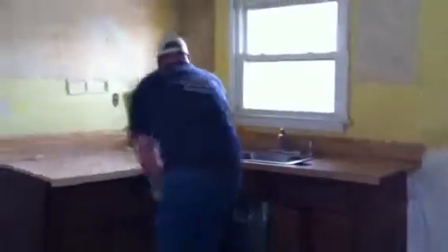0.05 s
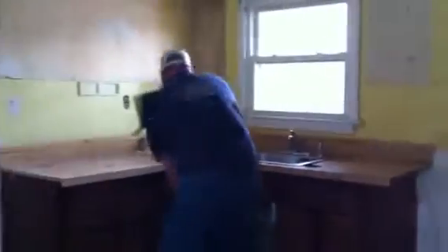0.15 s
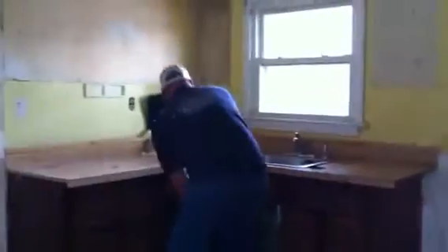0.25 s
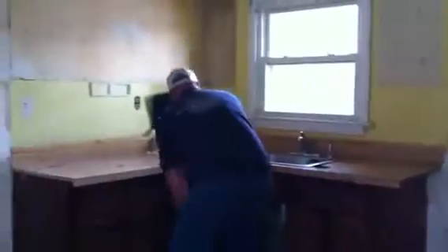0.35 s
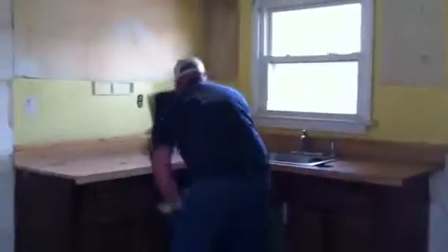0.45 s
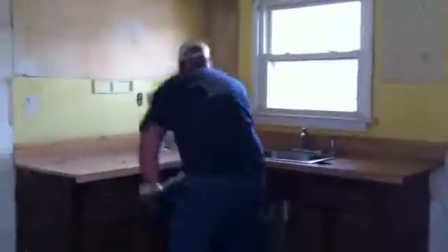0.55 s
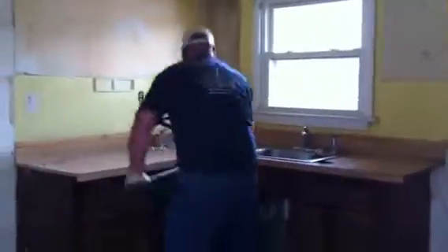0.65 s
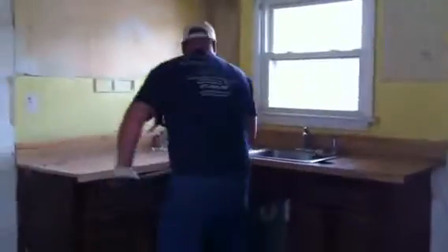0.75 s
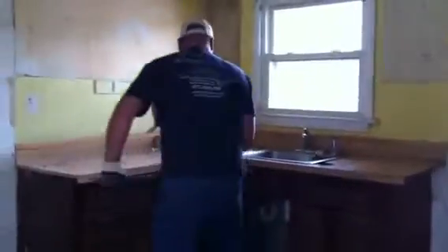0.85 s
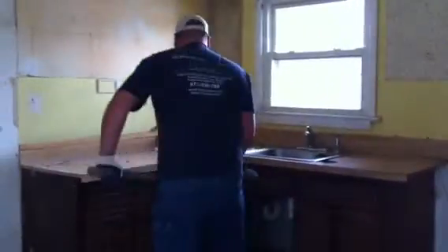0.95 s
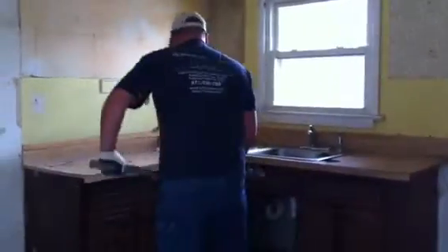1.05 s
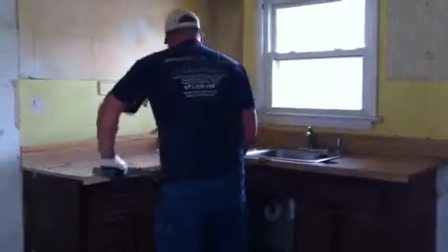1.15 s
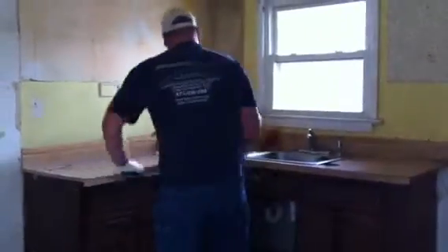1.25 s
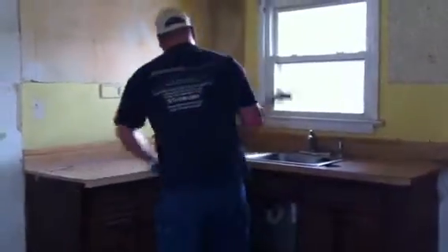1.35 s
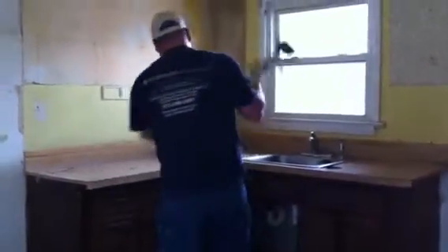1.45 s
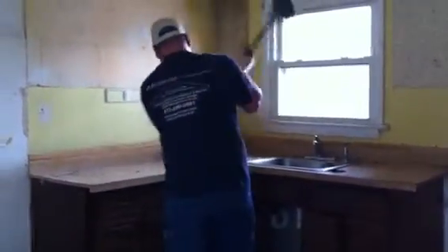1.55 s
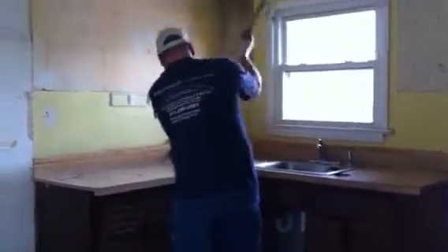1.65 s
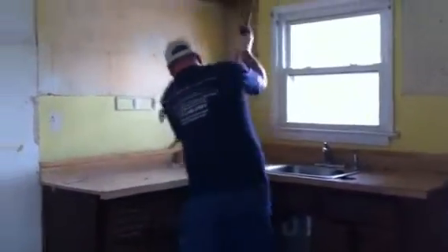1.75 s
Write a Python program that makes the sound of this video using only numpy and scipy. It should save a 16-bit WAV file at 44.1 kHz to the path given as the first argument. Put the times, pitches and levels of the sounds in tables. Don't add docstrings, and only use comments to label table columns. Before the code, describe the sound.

Heavy countertop being torn loose: low rumbling thumps and creaky cracks build to a loud slab crash, shards clatter, then one sharp clack and near quiet. Reverberant empty kitchen, small camera microphone with little bass.

```python
import sys
import numpy as np
from scipy import signal
from scipy.fft import rfft, irfft, next_fast_len
from scipy.io import wavfile
from scipy.ndimage import uniform_filter1d

SR = 44100
rng = np.random.default_rng(int(sys.argv[2]) if len(sys.argv) > 2 else 0)


def bounce(signal):
    frames = np.transpose(np.atleast_2d(signal))
    limited = np.clip(frames, -1, 1)
    pcm = np.round(limited * 32767).astype(np.int16)
    wavfile.write(sys.argv[1], SR, pcm)


def gain_from_db(level_db):
    decades = np.asarray(level_db, float) / 20
    return 10 ** decades


N = 79380
T_S = np.arange(N) / SR

# (time [s], level [dB], hold [s], centre of modes stirred [Hz])
THUD_EVENTS = [(.0, -33.5, 0.12, 297), (.001, -32, 0.15, 174), (0.031, -30.5, 0.028, 303),
               (.12, -35, 0.083, 193), (0.146, -26, 0.018, 250), (0.181, -31.5, 0.051, 236),
               (0.24, -28, 0.048, 277), (0.248, -29, 0.035, 149), (.314, -30, 0.013, 160),
               (.315, -29.5, 0.04, 270), (0.308, -22.5, 0.011, 363), (0.386, -24, 0.04, 259),
               (0.448, -27, 0.031, 237), (0.5, -28.5, 0.042, 187), (0.561, -24, 0.027, 330),
               (0.596, -27.5, 0.029, 198), (0.642, -19.5, 0.04, 264), (0.703, -26, 0.027, 260),
               (0.724, -22.5, 0.015, 200), (0.78, -30, 0.0098, 189), (0.821, -23, 0.0096, 284),
               (0.885, -31.5, 0.036, 305), (1.03, -42, 0.026, 280), (1.093, -42.5, 0.09, 280),
               (1.153, -38, 0.041, 238), (1.217, -42, 0.036, 287), (1.308, -38, 0.021, 270),
               (1.4, -45, 0.036, 268)]
CARCASS_MODE_HZ = [108, 154, 209, 245, 268, 310, 387, 421, 622]
# (level [dB], t60 [s])
CARCASS_MODES = [(-2.5, 0.05), (2.5, 0.22), (-3, 0.084), (-4.5, 0.16), (-0.5, 0.086), (-5.5, 0.64),
                 (-4, 0.11), (3, 0.26), (10.5, 0.083)]
# (time [s], frequency [Hz],
# level [dB], hold [s], t60 [s])
SLAB_EVENTS = [(.655, 106, -34, 0.06, 0.27), (.646, 172, -18, 0.012, 0.031),
               (.664, 153.4, -15, 0.022, 0.063), (.687, 209, -14.5, 0.033, 0.046),
               (.715, 200, -17, 0.017, .04), (.651, 316, -19.5, 0.024, .06), (.684, 312, -19, 0.028, .06),
               (.682, 420, -19, 0.024, 0.087), (0.78, 350, -29, 0.016, 0.066),
               (0.649, 625, -27.5, 0.056, .08), (.748, 266, -20, 0.023, .1), (.662, 245, -25, .012, .05),
               (.772, 616, -26, 0.015, 0.078), (.314, 300, -24, .01, .04),
               (.325, 204, -19.5, 0.0112, 0.031), (0.3, 246, -21, 0.0086, 0.053),
               (.352, 240, -26, .012, 0.045), (.369, 245.3, -19.5, .015, 0.12)]
# (time [s], level [dB], decay [s], centre [Hz])
KNOCK_EVENTS = [(.0, -40, 0.038, 740), (0.042, -32, 0.017, 790), (0.119, -33, 0.019, 770),
                (0.313, -24, 0.014, 960), (0.325, -30, 0.0098, 905), (0.214, -33, 0.055, 740),
                (0.564, -22.5, 0.015, 705), (0.641, -24, 0.018, 1160), (0.66, -24, 0.059, 805),
                (0.76, -32.5, 0.024, 740), (0.793, -38, 0.0091, 830), (0.846, -26.5, 0.02, 840),
                (1.059, -36, 0.026, 840), (1.15, -22, 0.011, 1220), (1.196, -32, 0.005, 1000),
                (1.305, -30, 0.0058, 830), (1.345, -47, 0.0067, 730), (1.412, -46, 0.007, 760),
                (1.436, -45, 0.007, 750), (1.53, -42, 0.0069, 1510)]
# (time [s], level [dB], decay [s], treble share [dB])
CRACK_EVENTS = [(.0, -28.5, 0.014, -26), (0.026, -29.5, 0.01, -23), (0.04, -29.5, 0.046, -42),
                (0.147, -31, 0.015, -16), (0.237, -35, 0.024, -12), (0.259, -32, 0.012, -7),
                (0.331, -31.5, 0.014, -2), (0.194, -38, 0.14, -20), (0.369, -33, 0.061, -14),
                (0.437, -41.5, 0.058, -6), (0.499, -38, 0.021, -11), (0.56, -26, 0.013, -42),
                (0.592, -40, 0.12, 1), (0.647, -16, 0.024, -10), (0.735, -37.5, 0.033, -10),
                (0.76, -27.5, 0.011, 0.5), (0.767, -27.5, 0.041, 0.5), (0.807, -46, 0.015, -4),
                (.815, -39, 0.0039, -9), (0.854, -28, 0.0098, 4), (0.866, -31, 0.015, -4),
                (0.273, -41, 0.007, -10), (1.084, -54, 0.012, -6), (1.159, -30, 0.0061, 3),
                (1.275, -50.5, 0.012, 9), (1.357, -53, 0.017, 2), (1.52, -43, 0.016, -24),
                (1.606, -51.5, 0.028, -9)]
# (time [s], frequency [Hz], level
# [dB], hold [s], t60 [s])
SHARD_EVENTS = [(.261, 2780, -32.5, 0.01, 0.055), (.279, 3500, -31, .008, .05),
                (.316, 1250, -33.5, 0.018, 0.038), (.433, 850, -39, 0.011, .04),
                (0.65, 1556, -29, 0.0086, .05), (0.669, 910, -30.5, 0.023, .06),
                (0.655, 2050, -25, 0.0071, 0.041), (0.666, 3300, -34.5, 0.029, .06),
                (.745, 4100, -32.5, 0.022, .05), (0.77, 4250, -29.5, 0.017, 0.075),
                (.775, 5220, -28, 0.011, 0.055), (.776, 2700, -45, 0.0091, .05),
                (.785, 1790, -30.5, 0.01, 0.059), (0.788, 856, -29.5, 0.012, 0.072),
                (0.796, 3270, -31.5, .008, .05), (.816, 3600, -40, 0.005, 0.036),
                (0.821, 4300, -32.5, 0.015, 0.049), (0.855, 3270, -31, 0.011, 0.064),
                (0.859, 1790, -33.5, .012, 0.13), (.868, 5200, -33, 0.019, .06),
                (.888, 9700, -39, 0.017, .05), (0.896, 3400, -37, 0.028, 0.088),
                (1.155, 1230, -29, 0.0048, 0.026), (1.156, 4670, -40.5, 0.0057, 0.18),
                (1.153, 4400, -36.5, 0.005, 0.11), (1.159, 2600, -39.5, 0.018, 0.1),
                (1.161, 2130, -47, 0.018, .15), (1.171, 1220, -36, 0.0087, 0.055),
                (1.195, 1080, -37, 0.0067, 0.054), (1.153, 561, -38.5, 0.028, 0.12),
                (1.226, 4700, -46.5, 0.016, .3), (1.306, 800, -47, 0.0067, .06)]
BAR_MODE_HZ = [2710, 2900, 3450, 3650, 5600, 8260, 11100]
# (level [dB], t60 [s])
BAR_MODES = [(-32, 0.04), (-42, 0.081), (-29.5, 0.06), (-34.5, 0.058), (-28.5, 0.068), (-36, 0.12),
             (-38.5, 0.078)]
# (frequency [Hz], level [dB], t60 [s])
PIECE_MODES = [(770, 3, 0.02), (1160, 3, 0.012), (1410, -2, 0.025), (2030, 4, 0.021), (2600, 2, 0.021),
               (3500, -3, 0.017), (4330, -1.5, 0.038), (4470, -17, 0.044)]
# (frequency [Hz], level [dB], t60 [s])
HOLLOW_MODES = [(600, -2, 0.09), (732, 6.5, 0.16), (784, 6, .1), (840, 4, .1)]
# (frequency [Hz], t60 [s])
ROOM_T60 = [(125, 0.49), (300, 0.57), (750, 0.8), (1300, 0.69), (3000, 0.53), (4800, 0.45), (8000, 0.46),
            (14000, 0.28)]
# (frequency [Hz], gain [dB])
MIC_RESPONSE = [(30, -16), (70, -3.5), (140, 1.5), (1000, 4), (5000, 0), (5600, -4), (11000, -4.5),
                (16000, -12)]
# (start [s], end [s], lower edge [Hz])
TREBLE_GAPS = [
    (.558, .563, 13000),
    (.633, .643, 5000),
    (1.142, 1.149, 4200),
    (1.514, 1.519, 6000),
]

ATTACK_S, SWELL_S, GRAIN_DB = 0.0019, 0.0011, 3
CARCASS_DB, SPREAD_OCT, RATTLE_DB, RATTLE_WIDTH_HZ = -8, 0.53, -3.5, 72
SLAB_ROUGH_DB, SHARD_ROUGH_DB, BAR_ROUGH_DB = -12, -5, -3
KNOCK_DB, OVERTONE_DB = 12, -5
BAR_S, BAR_HOLD_S = 0.26, 0.0057
PIECE_S, PIECE_DECAY_S, PIECE_DB = 1.153, 0.012, 5
ROLL_S, ROLL_WIDTH_S, ROLL_DB = 1.45, 0.044, -51.5
SWISH_S, SWISH_WIDTH_S, SWISH_DB = 1.692, 0.042, -51.5
HUSH_DB, HUSH_LOW_DB = -55, 12.5
WET_DB, CARCASS_WET_DB, SLAB_WET_DB = 1, -6, -8
GAP_S, RIPPLE_DB, RIPPLE_HZ = 0.0011, 3, 14
DIP_HZ, DIP_WIDTH_HZ, DIP_SHARE = 457, 57, 0.35
OVERLOAD_DRIVE, TOP_HZ = 0.8, 15950


def table(points, hz):
    p = np.array(points, float)
    return np.interp(np.log(np.maximum(hz, 1)), np.log(p[:, 0]), p[:, 1])


def band(x, hz, width_hz):
    b, a = signal.iirpeak(min(hz, 0.45 * SR), hz / width_hz, fs=SR)
    return signal.lfilter(b, a, x)


def band_twice(x, hz, width_hz):
    return band(band(x, hz, width_hz), hz, width_hz)


def unit(x):
    return x / np.sqrt(np.mean(x ** 2))


def grains():
    contacts = np.clip(rng.standard_normal(N), -2, 2)
    size_db = GRAIN_DB * np.minimum(rng.exponential(size=N), 4)
    return unit(contacts * gain_from_db(size_db))


def burst(start_s, decay_s):
    u = np.maximum(T_S - start_s, 0)
    return (1 - np.exp(-u / ATTACK_S)) * np.exp(-u / decay_s)


def bell(centre_s, width_s):
    return np.exp(-0.5 * ((T_S - centre_s) / width_s) ** 2)


def ring(x, modes, pitch=0.97):
    out = 0
    for hz, db, t60_s in modes:
        width_hz = np.log(1000) / np.pi / t60_s
        out = out + gain_from_db(db) * band(x, hz * pitch, width_hz) * np.sqrt(t60_s)
    return out


def struck(hz, db, start_s, hold_s, t60_s, rough_db):
    u = np.maximum(T_S - start_s, 0)
    rough = unit(band(rng.standard_normal(N), hz, 30 + hz / 30))
    tone = np.sin(2 * np.pi * hz * u) + gain_from_db(rough_db) * rough
    level_db = db - 60 * np.maximum(u - hold_s, 0) / t60_s
    return (1 - np.exp(-u / SWELL_S)) * gain_from_db(level_db) * tone


def carcass():
    out = 0
    for hz, (mode_db, t60_s) in zip(CARCASS_MODE_HZ, CARCASS_MODES):
        power = 0
        for start_s, db, hold_s, centre_hz in THUD_EVENTS:
            u = np.maximum(T_S - start_s, 0)
            detune_db = 6 * (np.log2(hz / centre_hz) / SPREAD_OCT) ** 2
            fall_db = 60 * np.maximum(u - hold_s, 0) / t60_s
            level = gain_from_db(db + CARCASS_DB + mode_db - detune_db - fall_db)
            power = power + ((1 - np.exp(-u / SWELL_S)) * level) ** 2
        rattle = unit(band(rng.standard_normal(N), hz, RATTLE_WIDTH_HZ))
        tone = np.sin(2 * np.pi * (hz * T_S + rng.random()))
        out = out + np.sqrt(power) * (tone + gain_from_db(RATTLE_DB) * rattle)
    return out


def slab():
    return sum(struck(hz, db, start_s, hold_s, t60_s, SLAB_ROUGH_DB)
               for start_s, hz, db, hold_s, t60_s in SLAB_EVENTS)


def boards():
    contacts = grains()
    out = 0
    for start_s, db, decay_s, hz in KNOCK_EVENTS:
        hit = gain_from_db(db + KNOCK_DB) * contacts * burst(start_s, decay_s)
        body = band_twice(hit, hz, 0.72 * hz)
        overtone = band(hit, 1.845 * hz, 1.48 * hz)
        out = out + body + gain_from_db(OVERTONE_DB) * overtone
    return out


def splinters():
    contacts = grains()
    crackle = unit(band(contacts, 3230, 3960))
    spray = unit(band(band(contacts, 11000, 11000), 9500, 11600))
    return sum(gain_from_db(db) * burst(start_s, decay_s) * (crackle + gain_from_db(treble_db) * spray)
               for start_s, db, decay_s, treble_db in CRACK_EVENTS)


def shards():
    return sum(struck(hz, db, start_s, hold_s, t60_s, SHARD_ROUGH_DB)
               for start_s, hz, db, hold_s, t60_s in SHARD_EVENTS)


def bar():
    return sum(struck(hz, db, BAR_S, BAR_HOLD_S, t60_s, BAR_ROUGH_DB)
               for hz, (db, t60_s) in zip(BAR_MODE_HZ, BAR_MODES))


def loose_piece():
    clack = ring(grains() * burst(PIECE_S, PIECE_DECAY_S), PIECE_MODES)
    roll = bell(ROLL_S, ROLL_WIDTH_S) * unit(ring(grains(), HOLLOW_MODES))
    return gain_from_db(PIECE_DB) * clack + gain_from_db(ROLL_DB) * roll


def swish():
    return gain_from_db(SWISH_DB) * bell(SWISH_S, SWISH_WIDTH_S) * unit(band(grains(), 2400, 8300))


def room(x):
    ripple_bins = int(RIPPLE_HZ * N / SR)
    ripple = unit(uniform_filter1d(rng.standard_normal(N // 2 + 1), ripple_bins))
    out = 0
    for hz in 70 * 2 ** np.arange(0, 7.9, 0.25):
        power = band_twice(x, hz, hz / 4) ** 2
        decay_s = table(ROOM_T60, hz) / (2 * np.log(1000))
        for lag_s in (GAP_S, decay_s):
            keep = np.exp(-1 / (lag_s * SR))
            power = signal.lfilter([1 - keep], [1, -keep], power)
        diffuse = irfft(rfft(rng.standard_normal(N)) * gain_from_db(RIPPLE_DB * ripple), N)
        out = out + np.sqrt(power) * unit(band_twice(diffuse, hz, hz / 4))
    return gain_from_db(WET_DB) * out


def hush():
    noise = rng.standard_normal(N)
    rumble = band_twice(noise, 160, 270)
    hiss = band(noise, 2000, 3200)
    return gain_from_db(HUSH_DB) * unit(gain_from_db(HUSH_LOW_DB) * rumble + hiss)


def scene():
    low, boom = carcass(), slab()
    rest = boards() + splinters() + shards() + bar() + loose_piece() + swish()
    wet = room(gain_from_db(CARCASS_WET_DB) * low + gain_from_db(SLAB_WET_DB) * boom + rest)
    return (low + boom + rest + wet + hush())[None]


def thin_treble(x):
    for start_s, end_s, hz in TREBLE_GAPS:
        highpass = signal.butter(8, hz, "high", fs=SR, output="sos")
        treble = signal.sosfiltfilt(highpass, x)
        gate = uniform_filter1d(1.0 * (T_S > start_s) * (T_S < end_s), size=40)
        x = x - 0.97 * treble * gate
    return x


def band_limit(x):
    return signal.sosfilt(signal.butter(12, 15950, fs=SR, output="sos"), x)


def record(dry):
    size = next_fast_len(N + 8192)
    hz = np.arange(size // 2 + 1) * SR / size
    x = irfft(rfft(dry, size) * gain_from_db(table(MIC_RESPONSE, hz)), size)[:, :N]
    x = x - DIP_SHARE * band(x, DIP_HZ, DIP_WIDTH_HZ)
    x = np.tanh(OVERLOAD_DRIVE * x) / OVERLOAD_DRIVE
    x = signal.sosfilt(signal.ellip(10, 0.2, 70, TOP_HZ, fs=SR, output="sos"), x)
    mix = thin_treble(x)
    return band_limit(mix)


dry = scene()
out = record(dry)
bounce(out)
```